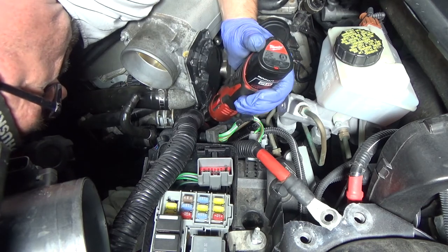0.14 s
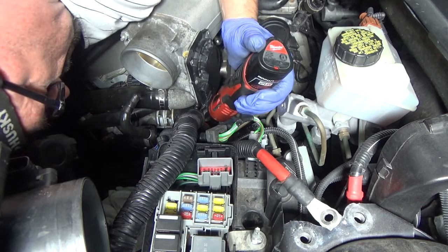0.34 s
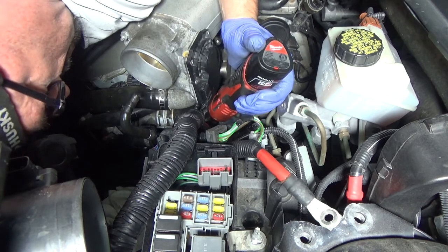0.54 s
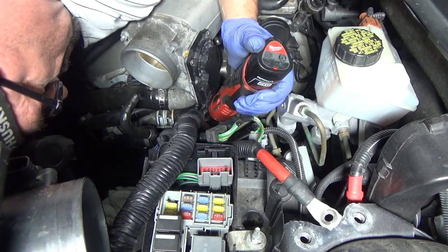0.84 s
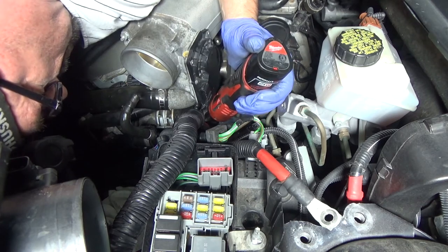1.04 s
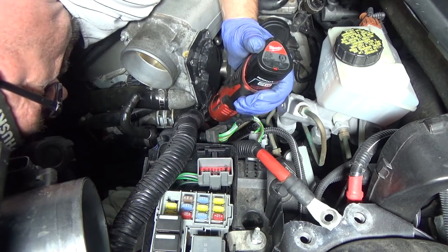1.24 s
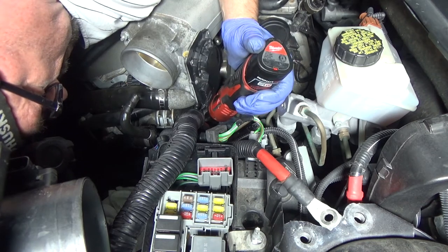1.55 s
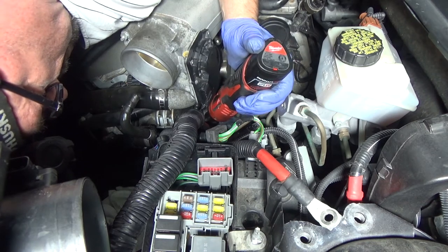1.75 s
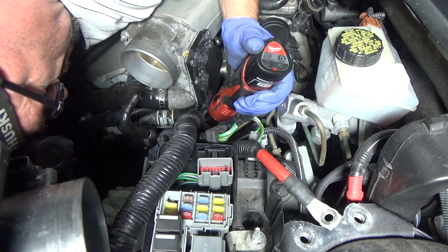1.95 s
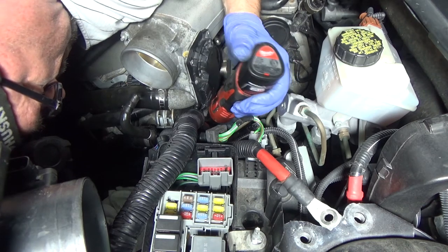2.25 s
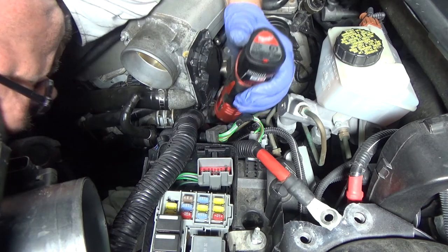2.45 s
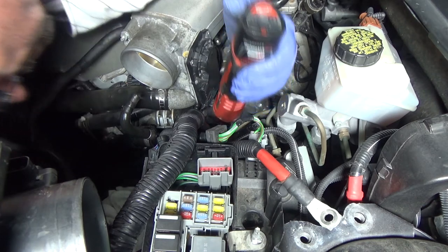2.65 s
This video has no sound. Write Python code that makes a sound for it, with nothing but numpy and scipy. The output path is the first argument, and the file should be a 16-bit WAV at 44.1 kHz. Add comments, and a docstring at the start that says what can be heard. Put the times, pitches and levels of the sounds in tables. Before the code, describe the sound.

Power ratchet spinning freely at steady speed, coasting down to slowing sharp clicks and a dull knock

```python
"""A cordless ratchet runs free of load in an engine bay for 1.9 s, then coasts almost to a stop by 2.8 s.
At speed, pawl drops (noise cracks, ringing steel) blur together over gear rattle made of noise puffs.
Pushes at the crank rate ring the handle; motor sines whine; steady coloured noise and rumble lie beneath.
While it coasts, hum and whine fall; from 2.3 s the pawl clicks stand apart; dull bumps come near the end.
The bay returns short noise-tail scatter throughout."""
import sys
import numpy as np
from scipy import signal
from scipy.fft import rfft, irfft
from scipy.io import wavfile
from scipy.ndimage import uniform_filter1d

SR = 44100
rng = np.random.default_rng(int(sys.argv[2]) if len(sys.argv) > 2 else 0)


def wav_out(sig):
    """Save sig, one row per channel (or a flat mono array), as 16-bit PCM at SR to the path in sys.argv[1]."""
    wavfile.write(sys.argv[1], SR, np.round(np.clip(np.atleast_2d(sig).T, -1, 1) * 32767).astype(np.int16))


N = 123479

KNOCK_TURN = 0.15  # share of the crank turn at which the yoke knocks and pushes the handle
SOCKET_TURNS = 20.05  # crank turns per turn of the socket


def amp(db):
    """Decibels to amplitude factor."""
    return 10 ** (np.asarray(db) / 20)


def rms_one(x):
    """Scale to an RMS of 1."""
    return x / np.sqrt(np.mean(x ** 2) + 1e-20)


def in_time(rows):
    """Interpolate each column after the first, time_s, to one value per sample."""
    time_s, *columns = np.transpose(rows)
    return [np.interp(np.arange(N) / SR, time_s, column) for column in columns]


def split_filter(order, hz, kind):
    """Butterworth sections."""
    return signal.butter(order, hz, kind, fs=SR, output="sos")


def colour(x, points):
    """Causal minimum-phase filter with the given spectrum, built by folding its cepstrum."""
    hz, db = np.transpose(points)
    size = 8192
    bin_hz = np.arange(size // 2 + 1) * SR / size
    spectrum_db = np.interp(np.log(bin_hz + 1), np.log(hz), db)
    cepstrum = irfft(np.log(amp(spectrum_db)))
    cepstrum[1:size // 2] *= 2
    cepstrum[size // 2 + 1:] = 0
    return signal.fftconvolve(x, irfft(np.exp(rfft(cepstrum))))[:N]


def drift(rate_hz):
    """Slow random wander of RMS 1: noise through two equal low-pass poles."""
    r = np.exp(-2 * np.pi * rate_hz / SR)
    noise = rng.standard_normal(N + SR)
    return rms_one(signal.lfilter([1], [1, -2 * r, r * r], noise)[SR:])


def sway():
    """Slow random share between 0 and 1 as the tool moves in the hands."""
    return (1 + np.tanh(1.3 * drift(4.8))) / 2


def ring(clicks, hz, t60_s):
    """Two-pole resonator: a unit click starts a decaying sine of height 1."""
    r, w = amp(-60 / (t60_s * SR)), 2 * np.pi * hz / SR
    return signal.lfilter([0, np.sin(w)], [1, -2 * r * np.cos(w), r * r], clicks + 1e-18)


def clicks_at(time_s, gain):
    """Single-sample clicks at the given moments."""
    out = np.zeros(N)
    np.add.at(out, np.clip((time_s * SR).astype(int), 0, N - 1), gain)
    return out


def burst(clicks, t60_s):
    """Each click starts a puff of noise whose power dies away exponentially."""
    power = signal.lfilter([1], [1, -amp(-120 / (t60_s * SR))], clicks ** 2 + 1e-18)
    return np.sqrt(power) * rng.standard_normal(N)


def each_turn(turns, share, scatter_turns):
    """Moments (s) at which the crank passes a share of its turn; -1 if outside the scene."""
    at = np.arange(int(turns[-1]) + 1) + share
    at = at + scatter_turns * rng.standard_normal(len(at))
    return np.interp(at, turns, np.arange(N) / SR, left=-1, right=-1)


def housing(x, shift):
    """Housing resonances: a chain of peaking filters, those above 1100 Hz shifted by a share."""
    # hz, width_hz, peak_db
    housing_modes = [(331.8, 26.6, 17.5), (792, 103, 6), (1034, 57, -1), (1267, 52, -7), (1497, 81, 6),
                     (2016, 130, -4.5), (2170, 170, 4), (2540, 180, 5.5), (3820, 78, 5.5), (5670, 58, -2)]
    for hz, width_hz, db in housing_modes:
        w = 2 * np.pi * hz * (1 + shift * (hz > 1100)) / SR
        a, half = amp(db / 2), np.pi * width_hz / SR
        middle = -2 * np.cos(w)
        x = signal.lfilter([1 + half * a, middle, 1 - half * a], [1 + half / a, middle, 1 - half / a], x)
    return x


def pawl(speed, turns):
    """Each drop of the pawl over a tooth, with one rebound, cracks as noise and rings the steel."""
    # drops at speed: share_of_turn, level_db, scatter_turns
    fast_drops = [(-.27, -14, .025), (-.12, -12.5, 0.033)]
    # drops heard singly as the crank slows: start_s, level_db, lower_db (extra below lower_hz)
    slow_drops = [(2.3017, -12, 4), (2.3054, -15, 0), (2.321, -13, 0), (2.3248, -7, 0), (2.3452, -6, -2),
                  (2.3484, -12, -7), (2.3675, -10.5, -3), (2.3703, -10, 0), (2.3929, -12, 8),
                  (2.397, -10, 2), (2.402, -14, -2), (2.419, -11, 3), (2.4217, -7, -2), (2.4471, -8, -9),
                  (2.4504, -7, -5), (2.476, -7, -7), (2.4804, -8.5, -10), (2.5076, -11, -2),
                  (2.5134, -3.5, -13), (2.5434, -6.5, -2), (2.5495, -6.5, -7), (2.5828, -8.5, -12),
                  (2.5895, -8.5, -12), (2.621, -30, 10), (2.6286, -5, -4), (2.6362, -7, -6),
                  (2.6845, -8, -1), (2.6939, -8.5, 2.5), (2.7075, -29, -2), (2.7426, -29, 6),
                  (2.7598, -8, -5), (2.7743, -8.5, 2.5)]
    # pawl and ratchet wheel modes: hz, relative_db, t60_s
    steel_modes = [(3710, -26, 0.011), (4370, -22, 0.019), (5750, -42, 0.0084), (6020, -26.5, 0.01),
                   (8800, -21, 0.01), (10620, -10.5, 0.011), (12040, -7, 0.0043), (11820, -7.5, 0.017),
                   (12640, -6.5, 0.018), (12680, -8, 0.0069), (12370, -1.5, 0.011), (14380, -31, 0.0033),
                   (14430, -6.5, 0.0048)]
    # crack spectrum: hz, relative_db_per_hz
    crack_spectrum = [(300, -23), (800, -32.5), (3000, -24), (3700, -8), (5000, -46), (6200, -12.5),
                      (7200, -36), (9000, -52), (11500, -0.5), (13600, -2.5), (16000, -17)]
    drop_scatter_db, mode_scatter_db = 2.5, 3
    crack_db, crack_t60_s, ring_db, lower_hz = 7, 0.0045, -6, 9500

    s, db, lower_db = np.transpose(slow_drops)
    for share, level_db, scatter_turns in fast_drops:
        t = each_turn(turns, share, scatter_turns)
        level = level_db + drop_scatter_db * rng.standard_normal(len(t))
        fast = (t > 0) & (t < slow_drops[0][0] - 1 / 200)
        s, db = np.append(s, t[fast]), np.append(db, level[fast])
        lower_db = np.append(lower_db, 0 * t[fast])

    # rebounds weaken as the crank slows
    rebound_db = -2.5 - 8 * (1 - speed[(s * SR).astype(int)] / speed[0])
    s = np.append(s, s + rng.uniform(0.00105, 0.00255, len(s)))
    db, lower_db = np.append(db, db + rebound_db), np.tile(lower_db, 2)

    out = np.zeros(N)
    for kind, level in (("low", db + lower_db), ("high", db)):
        crack = colour(burst(clicks_at(s, amp(level)), crack_t60_s), crack_spectrum)
        out += amp(crack_db) * signal.sosfilt(split_filter(4, lower_hz, kind), crack)
    for hz, mode_db, t60_s in steel_modes:
        hit_db = db + mode_db + ring_db + lower_db * (hz < lower_hz)
        hit_db = hit_db + mode_scatter_db * rng.standard_normal(len(s))
        sign = rng.choice([-1, 1], len(s))
        out += ring(clicks_at(s, amp(hit_db) * sign), hz, t60_s)
    return signal.sosfilt(split_filter(2, 1500, "high"), out)


def gears(speed, turns):
    """Random tooth contacts, weaker in the slack part of the turn, and one yoke knock a turn, as noise puffs."""
    # gear noise: time_s, middle_db, low_db, treble_db (before the trims below)
    gear_levels = [(0.0, -33, -35, -23), (0.01, -30.5, -40.5, -22), (0.08, -28.5, -34.5, -17.5),
                   (0.14, -33, -42, -21.5), (0.25, -28.5, -35.5, -18.5), (0.44, -30.5, -40, -19.5),
                   (0.49, -26.5, -38.5, -18.5), (0.63, -31.5, -38, -19.5), (0.74, -27.5, -37.5, -18.5),
                   (0.85, -33, -36, -20.5), (0.87, -32, -41.5, -20.5), (0.97, -28, -35.5, -17.5),
                   (1.13, -31, -39, -21), (1.25, -26.5, -34.5, -18), (1.28, -31.5, -39, -19.5),
                   (1.5, -28.5, -36, -18.5), (1.61, -30.5, -41, -19.5), (1.66, -28.5, -35, -18),
                   (1.87, -30.5, -39.5, -20.5), (1.99, -29.5, -33.5, -18.5), (2.13, -36, -41.5, -24),
                   (2.18, -30.5, -37, -21.5), (2.32, -40, -41.5, -29), (2.43, -40.5, -40.5, -31),
                   (2.45, -48.5, -46, -37.5), (2.54, -45.5, -43, -36.5), (2.69, -51.5, -53, -43.5),
                   (2.74, -59, -52, -48), (2.77, -55, -55, -49), (2.8, -63, -61, -53)]
    # body spectrum: hz, relative_db_per_hz
    body_spectrum = [(120, -42.5), (220, -38), (325, -25.5), (530, -17), (750, -3.5), (1040, -6.5),
                     (1500, -6), (2000, -4.5), (3700, 1.5), (6100, -0.5), (6800, -8.5), (7500, -14.5),
                     (9500, -45.5)]
    # treble spectrum: hz, relative_db_per_hz
    treble_spectrum = [(5500, -51), (6900, -16), (7700, -12), (8660, -6.5), (11000, -4), (12200, 0.5),
                       (15100, -9), (15800, 4.5), (16300, -18)]
    low_trim_db, middle_trim_db, treble_trim_db, split_hz = -1.5, 0.5, -1.5, 1860
    contacts_per_turn, contact_spread_db, contact_t60_s = 30, 2, 0.005
    slack_until_turn, slack_db = 0.094, -2.5  # slack from half a turn before the count
    knock_scatter_turns, knock_db, knock_scatter_db, knock_t60_s = 0.015, 5, 3, 0.014
    whirr_share, whirr_power, grip_shift = 0.34, 0.61, 0.023

    turn_share = (turns + .5) % 1 - .5
    size_db = contact_spread_db * np.minimum(rng.exponential(1, N), 4)
    size_db = size_db + slack_db * (turn_share < slack_until_turn)
    contacts = amp(size_db) * (rng.random(N) < contacts_per_turn * speed / SR)
    t = each_turn(turns, KNOCK_TURN, knock_scatter_turns)
    knocks = clicks_at(t, (t > 0) * amp(knock_db + knock_scatter_db * rng.standard_normal(len(t))))
    rattle = burst(contacts, contact_t60_s) + burst(knocks, knock_t60_s)
    rattle = rattle / np.sqrt(uniform_filter1d(rattle ** 2, size=8000) + 1e-9)  # level over 0.18 s
    # smooth bearing noise takes over as the crank slows
    rattle = rattle + whirr_share * (speed[0] / speed) ** whirr_power * rng.standard_normal(N)

    middle_db, low_db, treble_db = in_time(gear_levels)
    plain, grip = colour(rattle, body_spectrum), sway()
    body = grip * housing(plain, grip_shift) + (1 - grip) * housing(plain, -grip_shift)
    low = signal.sosfilt(split_filter(4, split_hz, "low"), body)
    middle = signal.sosfilt(split_filter(4, split_hz, "high"), body)
    treble = colour(rattle, treble_spectrum)
    return (amp(low_db + low_trim_db) * rms_one(low) + amp(middle_db + middle_trim_db) * rms_one(middle)
            + amp(treble_db + treble_trim_db) * rms_one(treble))


def hum(speed, turns):
    """A push each turn rings the handle, so crank orders slide through its modes as the tool slows."""
    # handle modes: hz, relative_db, t60_s
    handle_modes = [(158, -62, 0.062), (263, -65, 0.088), (321.4, -47.5, 0.11), (420, -51.5, 0.045),
                    (496, -57, 0.041), (613, -52, 0.052), (680, -46, 0.029), (764, -41.5, 0.07),
                    (848, -44.5, 0.03), (1205, -53, 0.046), (1506, -42, 0.061)]
    # main hum: time_s, level_db (before hum_trim_db)
    hum_levels = [(0.0, -60), (0.05, -52.5), (0.55, -55.5), (0.6, -63), (0.66, -53.5), (1.19, -51.5),
                  (1.24, -50), (1.32, -55), (1.92, -50.5), (2.06, -45.5), (2.13, -64), (2.24, -49),
                  (2.29, -79), (2.4, -50), (2.46, -91), (2.59, -75), (2.67, -87), (2.8, -77)]
    hum_trim_db, main_hum_hz = 53.5, 327  # the main hum is the mode within 40 Hz
    push_scatter_turns, push_scatter_db = 0.0071, 2.5
    waver_db, waver_hz, thump_power = 2.5, 3.7, 1.1
    thump_pulse_db, thump_peak_turn = 3, 2.3  # one swell per socket turn
    hum_pulse_db, hum_peak_turn = 2, 4.4  # two swells per socket turn

    t = each_turn(turns, KNOCK_TURN, push_scatter_turns)
    pushes = clicks_at(t, (t > 0) * amp(push_scatter_db * rng.standard_normal(len(t))))
    # below 97 % speed random shaking replaces the regular push on the main hum
    loose = np.clip(20 * (.97 - speed / speed[0]), 0, 1)
    shaking = (1 - loose) * pushes + loose * np.sqrt(speed / SR) * rng.standard_normal(N)

    socket_angle = 2 * np.pi / SOCKET_TURNS
    hum_pulse = hum_pulse_db * np.cos(2 * socket_angle * (turns - hum_peak_turn))
    hum_level = amp(in_time(hum_levels)[0] + hum_trim_db + hum_pulse)
    thump_pulse = thump_pulse_db * np.cos(socket_angle * (turns - thump_peak_turn))
    thump_level = (speed / speed[0]) ** thump_power * amp(thump_pulse)

    out = np.zeros(N)
    for k, (hz, db, t60_s) in enumerate(handle_modes):
        if abs(hz - main_hum_hz) < 40:
            drive = shaking * hum_level
        else:
            drive = pushes * thump_level * amp(waver_db * drift(waver_hz))
        out += (-1) ** k * ring(drive * amp(db), hz, t60_s)
    return out


def whine(speed, turns):
    """Wavering motor sines glide down with speed and swell as they cross the housing's resonances."""
    # motor tones: crank_speed_multiple, level_db (before the housing), speed_power
    motor_tones = [(4.39, -60, 3.4), (8.8, -71, 1.2), (10.89, -61, 0.93), (13.99, -53, 1.54),
                   (17.62, -59, 1.1), (52.83, -44.5, 2.4)]
    waver_db, waver_hz = 5.5, 2.1
    tones = np.zeros(N)
    for multiple, db, power in motor_tones:
        level = amp(db + waver_db * drift(waver_hz)) * (speed / speed[0]) ** power
        tones += level * np.sin(2 * np.pi * (multiple * turns + rng.random()))
    return housing(tones, 0)


def bumps():
    """Dull knocks of the tool against the engine: clicks ring one damped mode."""
    # knocks: start_s, level_db (before trim_db)
    bump_list = [(2.619, -50), (2.747, -51), (2.788, -25.5)]
    trim_db, hz, t60_s = -11.5, 795, 0.019
    s, db = np.transpose(bump_list)
    return ring(clicks_at(s, amp(db + trim_db)), hz, t60_s)


def bay(x, t60_s):
    """Close metal surfaces scatter the sound: two decaying noise tails, mixed by the sway of the tool."""
    t = np.arange(int(.2 * SR)) / SR
    tails = rng.standard_normal((2, len(t))) * amp(-60 * t / t60_s) * (t > 1 / 1000)
    tails = tails / np.sqrt(np.sum(tails[0] ** 2))
    one, other = signal.fftconvolve(x[None], tails, axes=1)[:, :N]
    angle = np.pi * sway()
    return np.cos(angle) * one + np.sin(angle) * other


def steady_noise():
    """Steady coloured noise with a hum-like hump near 800 Hz."""
    # noise spectrum: hz, relative_db_per_hz
    noise_spectrum = [(15, -85), (25, -55), (373, -39), (800, 3), (1400, -1), (2050, -30), (3620, -44),
                      (7710, -37), (13600, -7), (16000, -30)]
    return amp(-53) * rms_one(colour(rng.standard_normal(N), noise_spectrum))


def rumble(speed):
    """Faint low-passed noise, partly different on the two sides, that weakens as the crank slows."""
    level_db, side_db, cutoff_hz = -73.5, -16, 164
    mid, side = signal.sosfilt(split_filter(2, cutoff_hz, "low"), rng.standard_normal((2, N)))
    noise = rms_one(mid + amp(side_db) * side * [[1], [-1]])
    return amp(level_db) * noise * (speed / speed[0]) ** 0.27


def microphone(x):
    """Soft overload rounds the peaks, then the low cut follows."""
    overload, low_cut_hz = 0.48, 239
    return signal.sosfilt(split_filter(4, low_cut_hz, "high"), overload * np.tanh(x / overload))


def scene():
    """Sum the sources, then add bay scatter, side noise and rumble."""
    # crank: time_s, turns_per_s
    crank_speed = [(0.0, 84.49), (0.25, 83.83), (0.5, 84.49), (0.75, 84.21), (1.0, 84.21), (1.25, 82.41),
                   (1.5, 84.1), (1.75, 83.76), (1.9, 83.34), (2.0, 77.73), (2.1, 71.75), (2.2, 60.61),
                   (2.3, 49.87), (2.4, 38.47), (2.5, 31.04), (2.6, 21.77), (2.7, 15.7), (2.8, 7.42)]
    # uneven colour of the side noise, with deep gaps: hz, relative_db
    side_spectrum = [(60, -23), (87, -8), (130, -26), (180, -32), (260, -24), (380, -24.5), (550, -24),
                     (790, -24), (1140, -9), (1650, -18), (2380, -41), (3440, -22.5), (4970, -36),
                     (7180, -13.5), (10400, -22.5), (15000, -16)]
    start_turn, pan_db = -.36, .22  # pan: left up, right down
    bay_db, bay_t60_s, side_db, side_t60_s = -11.5, 0.074, 2, 0.068

    speed, = in_time(crank_speed)
    turns = start_turn + np.cumsum(speed) / SR
    tool = pawl(speed, turns) + gears(speed, turns) + hum(speed, turns) + whine(speed, turns)
    tool = microphone(tool + bumps() + steady_noise())
    side = amp(side_db) * colour(bay(tool, side_t60_s), side_spectrum)
    mid = tool + amp(bay_db) * bay(tool, bay_t60_s)
    return mid * amp([[pan_db], [-pan_db]]) + side * [[1], [-1]] + rumble(speed)


def record(dry):
    """Steep low-pass: 70 dB down from 16250 Hz up."""
    return signal.sosfilt(signal.cheby2(14, 70, 16250, fs=SR, output="sos"), dry)


dry = scene()
out = record(dry)
wav_out(out)
```